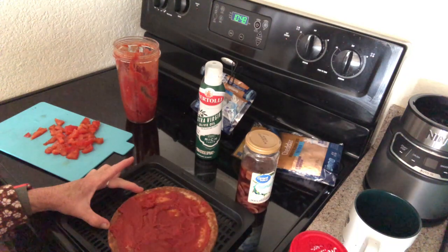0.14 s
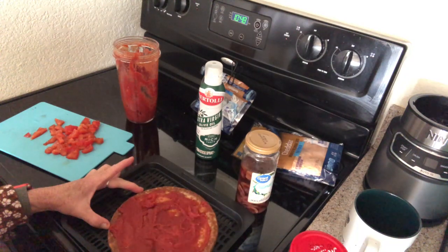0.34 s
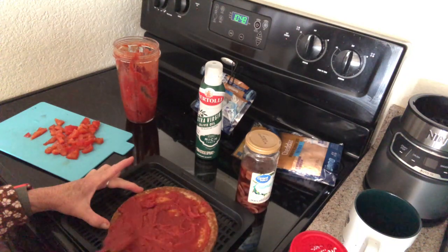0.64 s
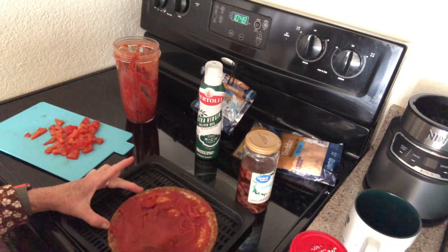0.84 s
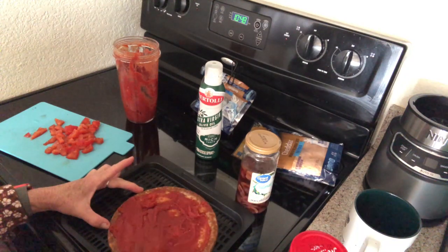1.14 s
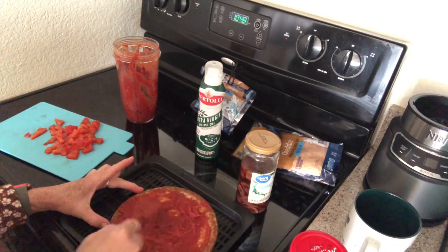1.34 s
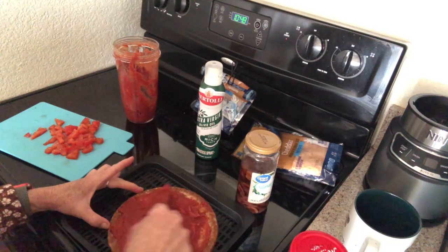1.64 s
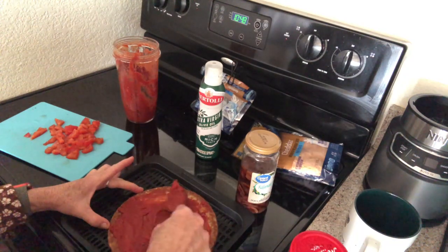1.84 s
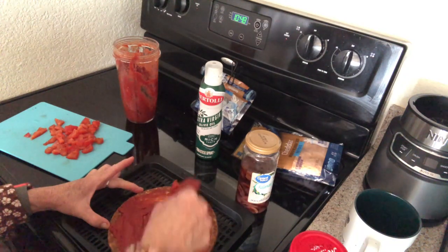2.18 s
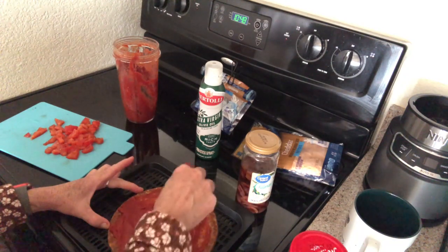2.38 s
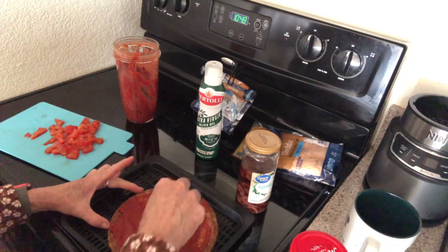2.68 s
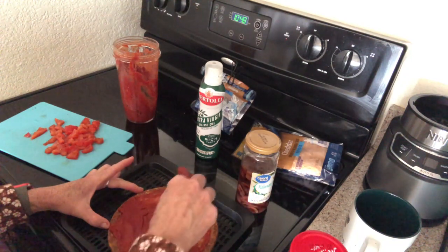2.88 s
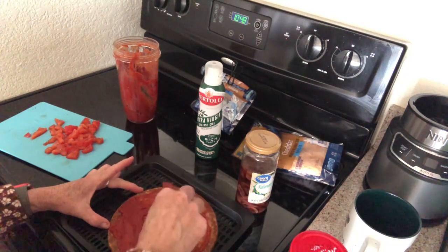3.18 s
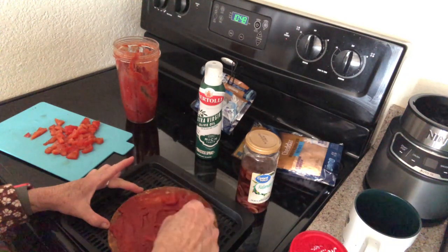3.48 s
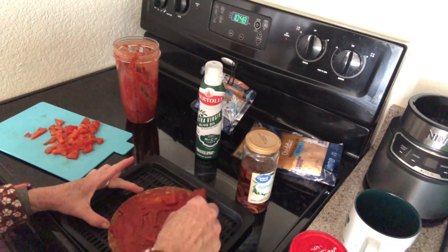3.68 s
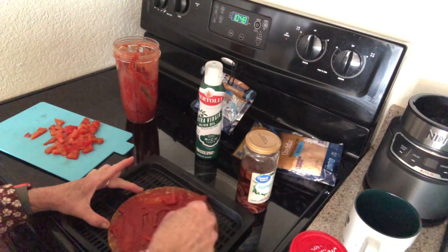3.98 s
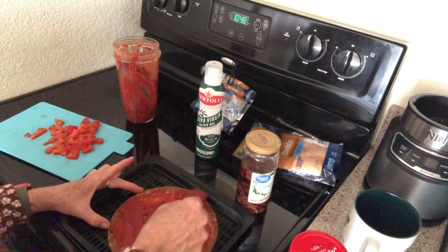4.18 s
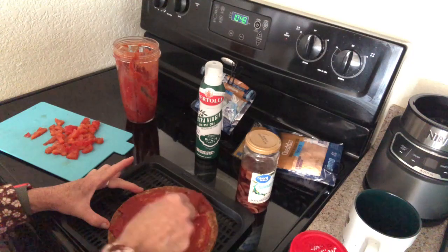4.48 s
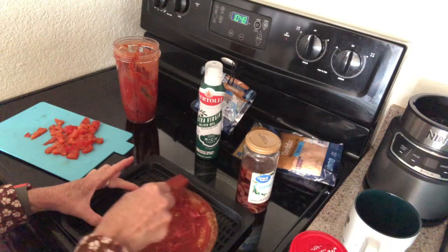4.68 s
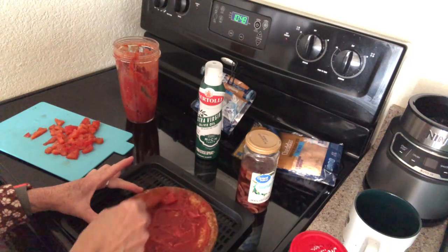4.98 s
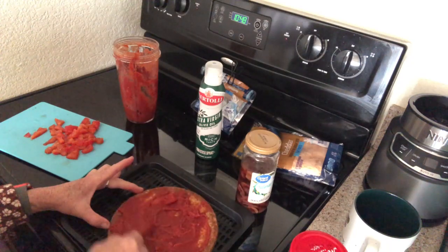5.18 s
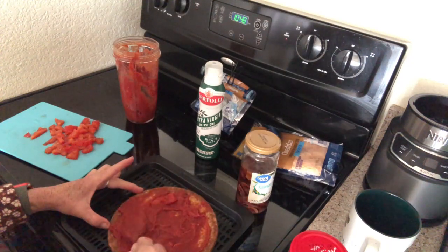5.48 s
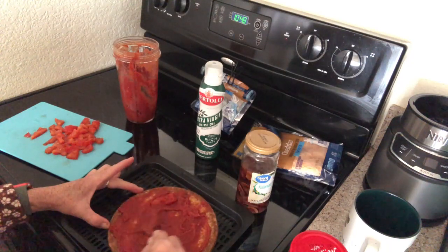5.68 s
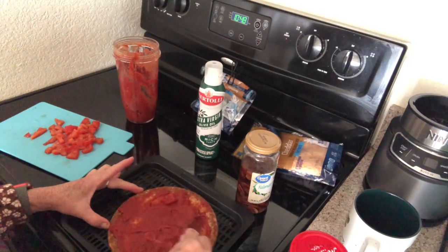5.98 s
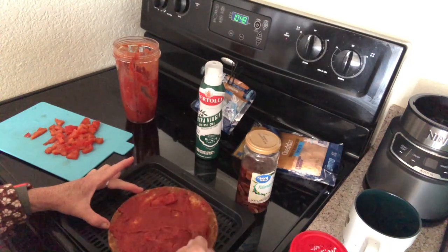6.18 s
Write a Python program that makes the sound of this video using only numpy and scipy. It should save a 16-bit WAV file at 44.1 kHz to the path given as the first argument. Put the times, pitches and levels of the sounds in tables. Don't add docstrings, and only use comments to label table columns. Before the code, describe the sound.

A low, steady refrigerator and fan hum fills a small kitchen, with soft gusts swelling in a duct. Tiny bright sauce ticks and faint spatula taps come first, then one very loud, dry metal click. Afterwards quiet taps gather into two harder pan knocks with wet squeezes, then sparse ticks. Close microphone, slight room reflection.

```python
import sys
import numpy as np
from scipy import signal
from scipy.fft import rfft, irfft
from scipy.io import wavfile
from scipy.ndimage import uniform_filter1d, map_coordinates

SR = 44100
rng = np.random.default_rng(int(sys.argv[2]) if len(sys.argv) > 2 else 0)


def invert_db(level):
    return 10 ** (np.asarray(level, dtype=float) / 20)


def master(y):
    cut = np.clip(np.atleast_2d(y).T, -1, 1)
    pcm = np.round(cut * 32767)
    wavfile.write(sys.argv[1], SR, pcm.astype(np.int16))


N = 279153


def at_hz(points, hz, column):
    points = np.array(points)
    return np.interp(np.log(hz), np.log(points[:, 0]), points[:, column])


def drift(rate_hz):
    knots = rng.standard_normal(400)
    return map_coordinates(knots, [np.arange(N) * rate_hz / SR], order=3)


def band(x, hz, octaves, order=2):
    edges = np.clip(hz * 2 ** (np.array([-.5, .5]) * octaves), 20, .45 * SR)
    return signal.sosfilt(signal.butter(order, edges, "band", fs=SR, output="sos"), x)


def ring(force, modes, longest_s):
    out = 0
    for hz, level_db, t60_s in modes:
        radius = invert_db(-60 / (min(t60_s, longest_s) * SR))
        angle = 2 * np.pi * hz / SR
        resonator = [1, -2 * radius * np.cos(angle), radius * radius]
        out = out + invert_db(level_db) * signal.lfilter([0, np.sin(angle)], resonator, force + 1e-18)
    return out


def add(track, start_s, sound, peak_db):
    i = round(start_s * SR)
    track[i:i + len(sound)] += (invert_db(peak_db) * sound / np.abs(sound).max())[:N - i]


# start_s, peak_db, centre_hz, width_octaves
TICKS = [(0.212, -55, 12600, .7), (0.336, -52.5, 6950, 0.38), (0.572, -55.5, 7450, .5),
         (1.1194, -56, 13000, 1.1), (1.6262, -59, 12500, .7), (1.6794, -67, 14500, .3),
         (1.718, -65, 11000, .3), (1.7863, -60, 13500, .5), (1.8865, -53, 13400, .6),
         (3.1288, -55, 13500, .6), (3.7898, -60, 14650, .25), (4.1856, -51.5, 9000, 0.77),
         (4.431, -55, 9450, 0.46), (4.548, -41, 10800, 1.2), (4.965, -65, 12200, .4),
         (5.012, -54, 13000, .6), (5.0493, -45.5, 13000, 0.92), (5.0844, -56, 14500, .4),
         (5.1164, -60, 14500, .4), (5.169, -62, 13000, .5), (5.189, -58, 10500, .6),
         (5.2534, -59, 13500, 0.77), (5.4755, -60.5, 8540, 0.33), (5.9824, -63, 12000, .6)]
# start_s, peak_db
KNOCK_BURSTS = [
    (4.216, -53),
    (4.591, -47),
    (4.604, -49),
]


def sauce():
    out, t = np.zeros(N), np.arange(3000) / SR
    events = [(*tick, 0.029) for tick in TICKS]
    events += [(start_s, peak_db, 12500, 0.66, .085) for start_s, peak_db in KNOCK_BURSTS]
    noises = rng.standard_normal((len(events), 3000))
    for (start_s, peak_db, hz, octaves, t60_s), noise in zip(events, noises):
        snap = invert_db(-60 * t / .006)
        tail = .4 * invert_db(-60 * t / t60_s)
        add(out, start_s, band(noise * (snap + tail), hz, octaves, order=3), peak_db)
    return out


# start_s, peak_db, centre_hz, contact_s
TAPS = [(1.1896, -49.5, 3300, 0.011), (1.8751, -50, 3600, 0.0041), (2.4014, -54, 2975, 0.0043),
        (3.584, -54.5, 2500, 0.0028), (3.9265, -51, 1320, 0.0096), (3.9569, -50, 2150, 0.00089),
        (3.969, -60, 2800, 0.002), (4.0, -54, 1100, 0.0099), (4.0315, -45.5, 1390, 0.0057),
        (4.044, -57, 1900, 0.0015), (4.06, -56, 1800, 0.0023), (4.2112, -38, 4040, 0.0068),
        (4.2157, -32, 3100, 0.006), (4.225, -43, 2550, 0.024), (4.2615, -45.5, 3270, 0.0076),
        (4.47, -63, 6000, 0.05), (4.543, -53.5, 1110, 0.0051), (4.588, -36, 3600, 0.0093),
        (4.6, -41, 4400, 0.0082), (4.615, -52, 3620, 0.03), (4.93, -59, 800, 0.0052),
        (5.254, -58, 2800, 0.0065), (5.5488, -51, 3830, 0.0059)]
# mode_hz, level_db, t60_s
PAN = [(1230, -7.5, 0.1), (2020, -14, 0.2), (2451, -8, 0.15), (2480, -22, 0.047), (3090, -16, 0.039),
       (3600, -6, 0.03), (4360, -4, 0.069), (7600, -18.5, .03)]
# start_s, peak_db, blow_centre_hz
KNOCKS = [
    (4.218, -39.5, 2330),
    (4.263, -44, 2800),
    (4.591, -41, 4600),
    (4.603, -47, 4600),
]
# start_s, peak_db
THUDS = [
    (3.585, -60),
    (3.9565, -65),
    (4.0305, -60),
    (4.216, -46.5),
    (4.263, -62),
    (4.589, -51.5),
    (5.5492, -67),
]


def spatula():
    out, t = np.zeros(N), np.arange(4000) / SR
    noises = rng.standard_normal((len(TAPS), 4000))
    for (start_s, peak_db, hz, contact_s), noise in zip(TAPS, noises):
        onset = np.minimum(t / (0.45 * contact_s), 1)
        grains = noise * np.exp(-(t / contact_s) ** 2) * onset
        add(out, start_s, band(grains, hz, octaves=1.11), peak_db)

    impulse = 1.0 * (np.arange(9000) == 0)
    rung = ring(impulse, PAN, longest_s=.25)
    for start_s, peak_db, hz in KNOCKS:
        add(out, start_s, band(rung, hz, octaves=2.7), peak_db)

    noises = rng.standard_normal((len(THUDS), 4000))
    for (start_s, peak_db), noise in zip(THUDS, noises):
        push = np.minimum(t / 0.0013, 1) * invert_db(-60 * t / 0.1)
        add(out, start_s, band(noise * push, hz=395, octaves=1.67), peak_db)
    return out


# start_s, peak_db
CLICK = [
    (2.4253, -5.2),
    (2.4282, -9),
    (2.4302, -18),
    (2.4318, -16),
    (2.4346, -18),
]


def click():
    out, t = np.zeros(N), np.arange(4000) / SR
    snap = np.cos(2 * np.pi * 3700 * (t - .0005)) * np.exp(-((t - .0005) / 0.00022) ** 2)
    for start_s, peak_db in CLICK:
        add(out, start_s, snap, peak_db)

    start_s = CLICK[0][0]
    middle, bright, low = rng.standard_normal((3, 4000))
    add(out, start_s + 0.00036, band(middle * invert_db(-60 * t / 0.041), 6350, octaves=0.98), peak_db=-25.5)
    add(out, start_s + .0004, band(bright * invert_db(-60 * t / 0.12), 12500, octaves=0.905), peak_db=-34.5)
    add(out, start_s + 0.00025, band(low * invert_db(-60 * t / 0.035), 1900, octaves=0.42), peak_db=-35)
    return out


# mode_hz, level_db, t60_s
SHEET = [(360, -14.5, 0.19), (1373, -14.5, 0.13), (1920, -5.5, 0.17), (2500, -2, 5.0), (2646, -33, 0.097),
         (3044, -39, 0.0097), (3600, -2.5, 0.046), (4600, -6.5, 0.11), (5776, -11, 0.14),
         (6340, -12, 0.051), (7630, -10, 0.074), (7170, -15, 0.18), (9000, -27, 0.11), (11540, -19, 0.05)]
# mode_hz, level_db, t60_s
STOVE = [(150.1, -56, 0.16), (335.7, -46.5, 0.092), (358, -50, 0.27), (427, -45.5, 0.17),
         (483, -42.5, 0.045), (770, -56.5, 0.29)]


def sheet():
    impulse = np.zeros(N)
    impulse[round(CLICK[0][0] * SR) + 20] = 1
    plate = band(ring(invert_db(-16) * impulse, SHEET, longest_s=0.018), 2670, octaves=4.0)
    return plate + ring(impulse, STOVE, longest_s=.3)


# band_hz, t60_s, level_db
KITCHEN = [(300, 0.63, -2), (679, 0.42, -3), (1030, 0.5, -6.5), (2000, 0.567, -14), (3480, 0.5, -20),
           (6000, 0.55, -14), (9040, 0.37, -9), (14270, 0.22, -14)]


def kitchen(x, near_db, near_t60_s, far_db):
    t, response = np.arange(SR // 2) / SR, 0
    for hz in 100 * 2 ** np.arange(0, 7.4, 1 / 3):
        far = invert_db(far_db - 60 * t / at_hz(KITCHEN, hz, 1))
        near = invert_db(near_db - 60 * t / near_t60_s)
        decay = invert_db(at_hz(KITCHEN, hz, 2)) * (far + near) * (t > .001)
        response = response + band(rng.standard_normal(len(t)) * decay, hz, octaves=1 / 3)
    return signal.fftconvolve(x, response)[:N]


# shaft_multiple, rms_db
WHINE = [(1, -67), (25, -71.5), (26, -75), (30, -83.5), (31, -92), (33, -75), (34, -83.5), (35, -88),
         (42, -89.5), (47, -115.5), (50, -101), (58, -78), (59, -95.5), (60, -87), (69, -92.5), (76, -98.5),
         (77, -88), (88, -92), (89, -86.0), (90, -88), (93, -86), (95, -87), (96, -86), (97, -86.5),
         (103, -90), (112, -86), (117, -92), (118, -85), (154, -86), (158, -88)]
# time_s, level_db on the first multiple
UNBALANCE = [(0, -8), (.7, -4), (1.3, 4.5), (2.2, -0.5), (2.9, -5), (3.4, -2), (4.1, 4), (4.8, 0),
             (5.4, -3.5), (6.33, 1)]
# tone_hz, rms_db, unsteadiness_db
TONES = [
    (120.0, -65, .4),
    (195.26, -54, 1.0),
    (240.0, -66, 1.0),
]


def refrigerator():
    t = np.arange(N) / SR
    shaft_hz, slip_hz, slip_rad = 58.948, 1.9, .012
    turn = 2 * np.pi * shaft_hz * t + slip_rad * np.sin(2 * np.pi * slip_hz * t)

    faint_db, faint_spread_db = 11, 5.0
    levels_db = at_hz(AIR, shaft_hz * np.arange(190) + 1, 1) + faint_db
    levels_db += faint_spread_db * rng.standard_normal(190)
    levels_db[:12] = -200
    for multiple, level_db in WHINE:
        levels_db[round(multiple)] = level_db

    spectrum = invert_db(levels_db) * np.exp(2j * np.pi * rng.random(190))
    first, spectrum[1] = np.abs(spectrum[1]), 0
    cycle = irfft(spectrum, 8192) * 4096 * np.sqrt(2)
    out = np.interp(turn / (2 * np.pi) % 1, np.arange(8192) / 8192, cycle, period=1)
    swell = invert_db(np.interp(t, *np.transpose(UNBALANCE)))
    out += first * swell * np.sqrt(2) * np.sin(turn)

    for hz, level_db, unsteady_db in TONES:
        level = np.sqrt(2) * invert_db(level_db + unsteady_db * drift(9))
        out += level * np.sin(2 * np.pi * hz * t + 0.11 * drift(3.2))
    return out


# time_s, top_rms_db
DUCT_SWELLS = [(0.0, -53), (.27, -54), (.75, -52.5), (1.4, -60), (1.9, -57), (2.6, -55.5), (3.42, -49.5),
               (4.06, -59), (4.32, -56), (4.78, -54.5), (5.25, -51), (5.65, -52), (6.2, -60)]


def duct():
    noise = band(rng.standard_normal(N + SR), hz=231.1, octaves=.085)[SR:]
    strength = uniform_filter1d(noise ** 2, size=8000) ** .5
    t = np.arange(N) / SR
    swell_s, calm_db = 0.096, -59.5
    power = invert_db(calm_db) ** 2
    for time_s, top_db in DUCT_SWELLS:
        power = power + invert_db(top_db) ** 2 * np.exp(-((t - time_s) / swell_s) ** 2)
    return noise / strength * np.sqrt(power)


# noise_hz, level_db per Hz
AIR = [(22, -118), (42, -88.5), (100, -92), (150, -85), (300, -87.5), (500, -91.5), (800, -99),
       (1300, -103), (2200, -111), (3200, -112), (4000, -112), (5500, -110), (8200, -118), (15800, -119)]
# centre_hz, width_hz, top_db per Hz
BOOMS = [(180, 30, -78), (265, 25, -84), (400, 30, -85), (630, 60, -93), (900, 300, -107), (1770, 70, -101),
         (3450, 120, -108), (4500, 200, -110), (5300, 300, -110), (9050, 150, -110), (9350, 120, -113),
         (10260, 90, -110), (7700, 700, -118), (12850, 200, -115)]


def air():
    hz = np.maximum(np.arange(N // 2 + 1) * SR / N, 1)
    power = invert_db(at_hz(AIR, hz, 1)) ** 2
    for centre_hz, width_hz, top_db in BOOMS:
        power += invert_db(top_db) ** 2 / (1 + (2 * (hz - centre_hz) / width_hz) ** 4)
    return irfft(rfft(rng.standard_normal(N)) * np.sqrt(power * SR / 2), N)


def scene():
    near, rung = sauce() + spatula() + click(), sheet()
    room = kitchen(near + 0.63 * rung, near_db=-9.5, near_t60_s=0.05, far_db=-26.5)
    hum = refrigerator() + duct() + air()
    return (near + rung + room + hum)[None]


def roll_off(x):
    return signal.sosfilt(signal.butter(12, 16490, fs=SR, output="sos"), x)


def record(dry):
    cut = signal.sosfilt(signal.ellip(10, .3, 60, 15700, fs=SR, output="sos"), dry)
    cut = signal.sosfilt(signal.butter(2, 28, "high", fs=SR, output="sos"), cut)
    return roll_off(cut)


dry = scene()
out = record(dry)
master(out)
```